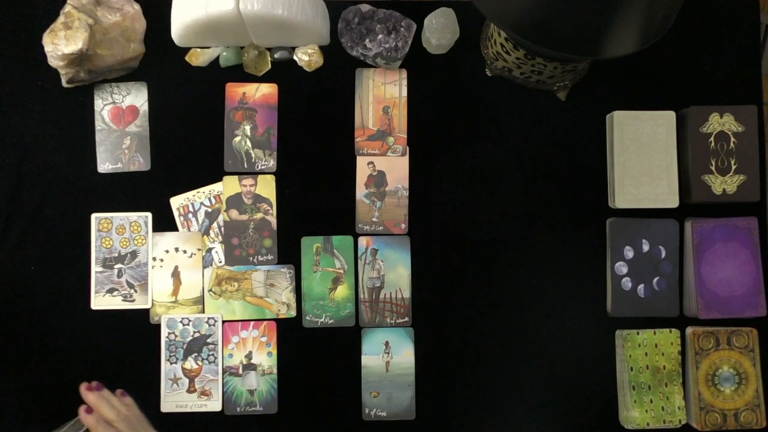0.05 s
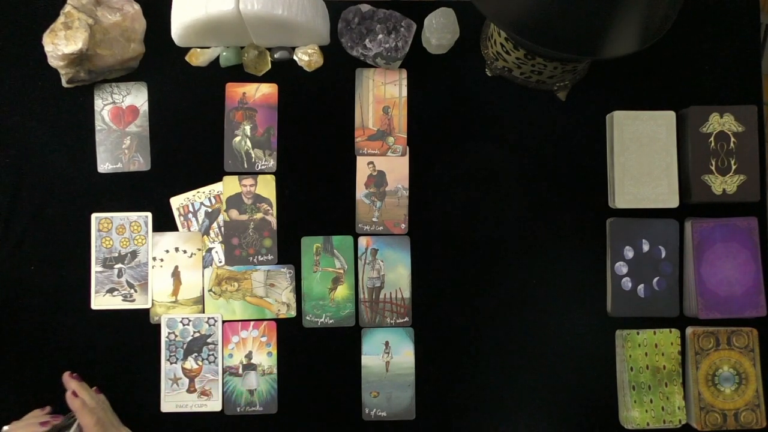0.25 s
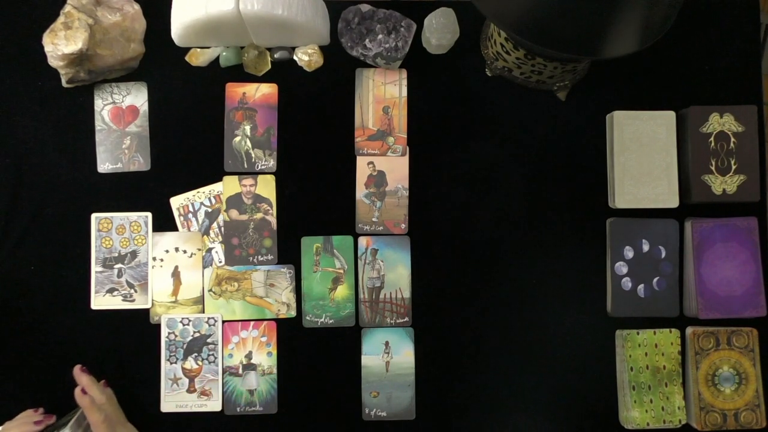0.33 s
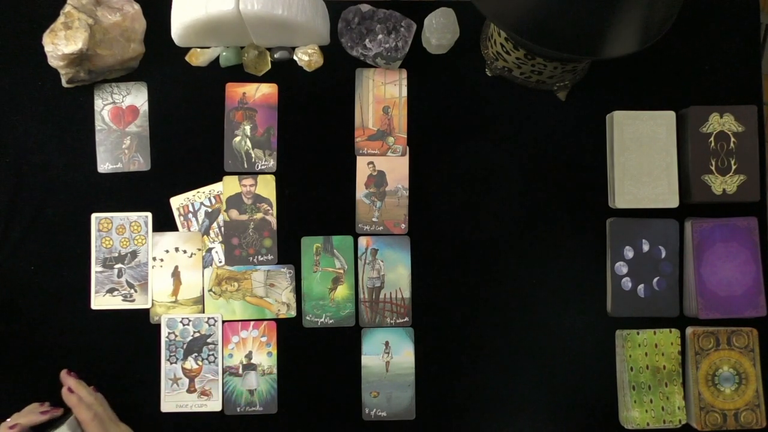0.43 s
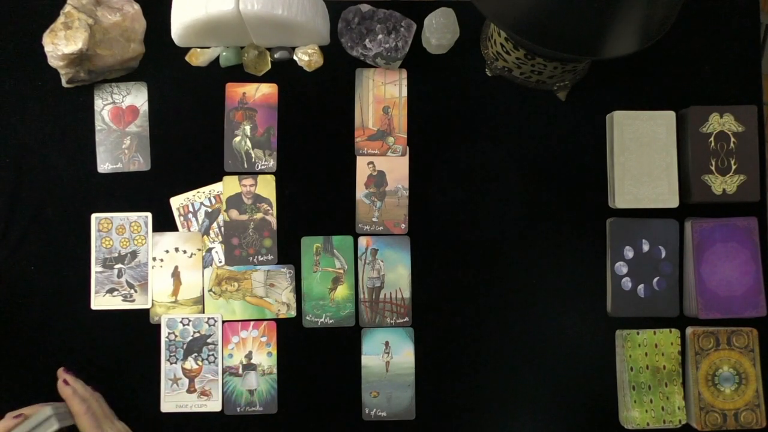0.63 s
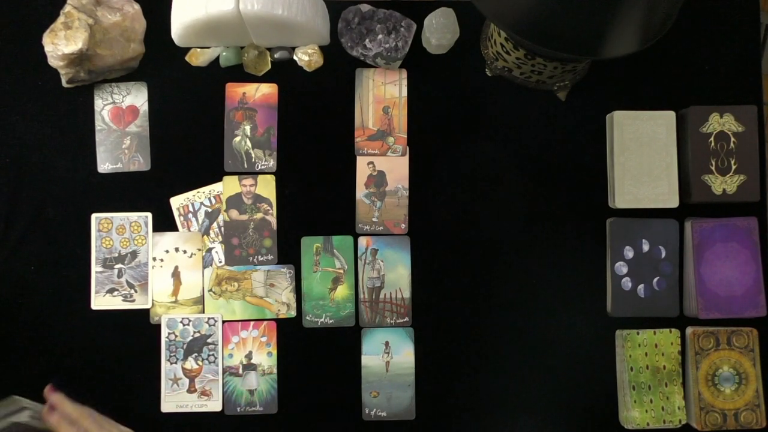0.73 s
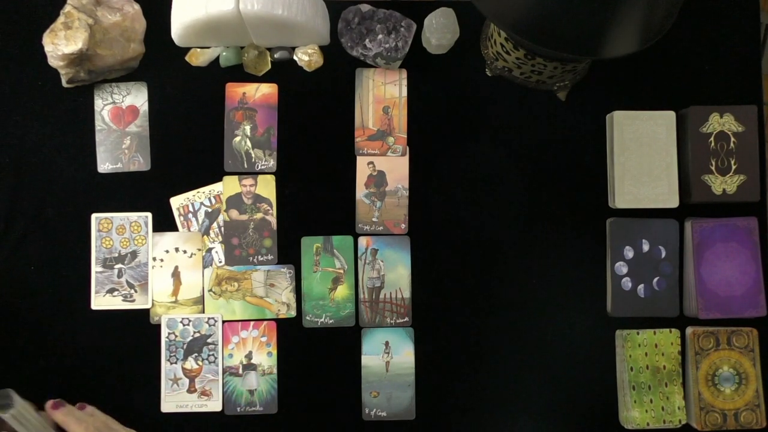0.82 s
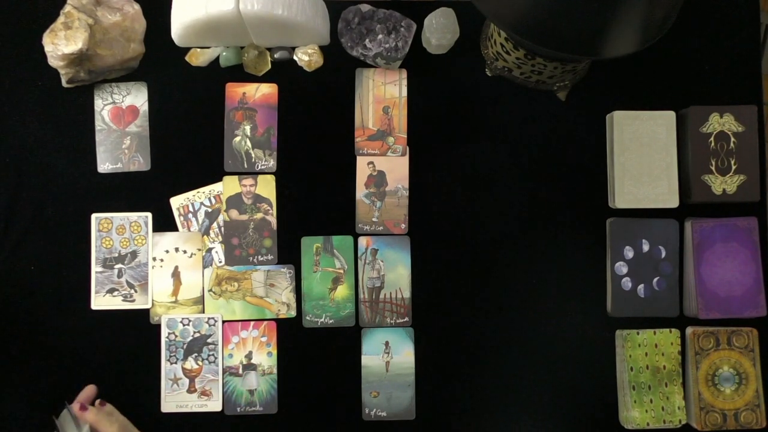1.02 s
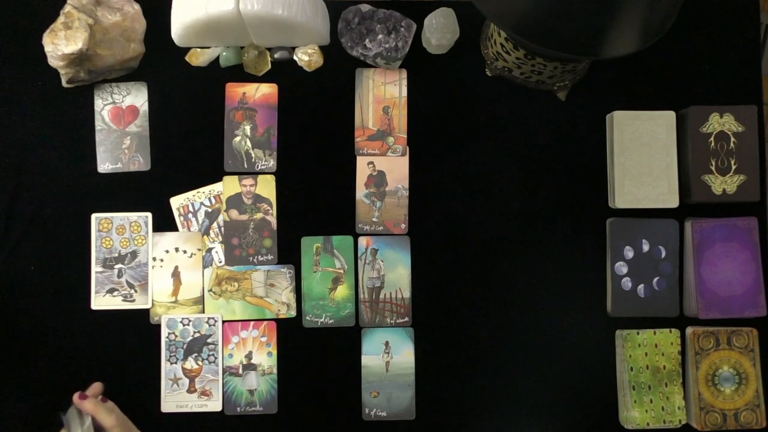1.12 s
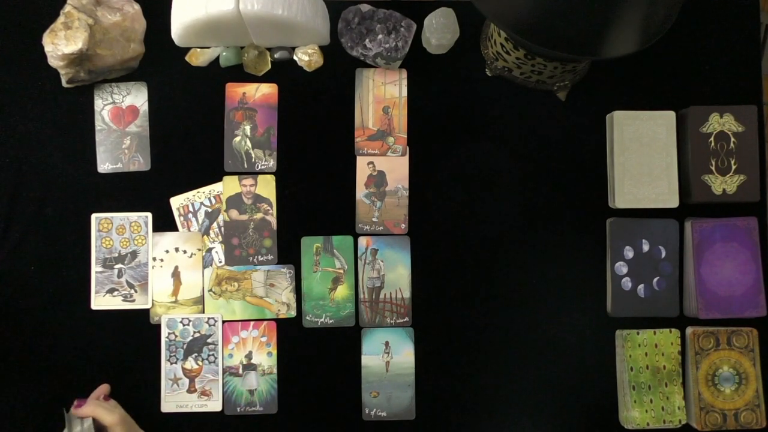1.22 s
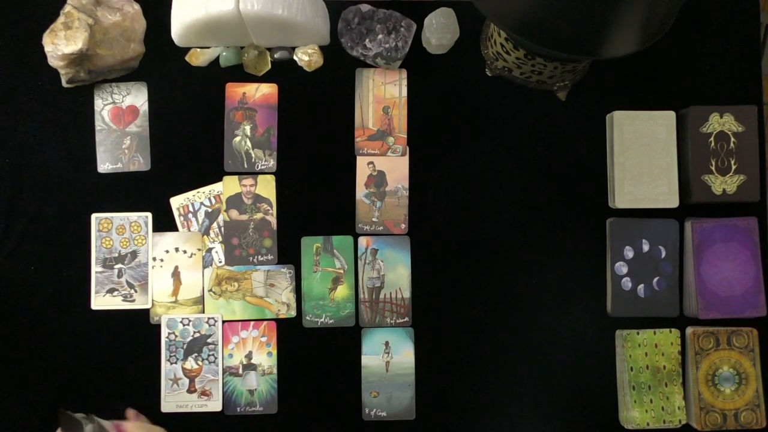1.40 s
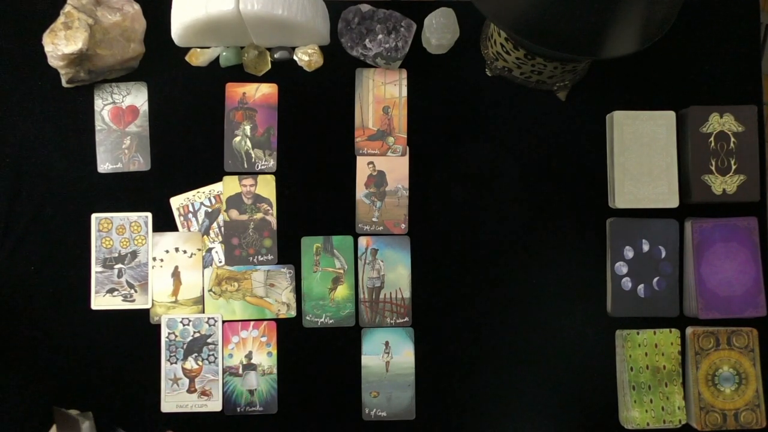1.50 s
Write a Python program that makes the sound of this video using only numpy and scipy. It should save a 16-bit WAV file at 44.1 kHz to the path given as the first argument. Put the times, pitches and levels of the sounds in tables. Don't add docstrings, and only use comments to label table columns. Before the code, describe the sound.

A deck of cards slaps hard onto a cloth-covered wooden table, then cards slide and tick

```python
import sys
import numpy as np
from scipy import signal
from scipy.fft import rfft, irfft
from scipy.io import wavfile
from scipy.ndimage import uniform_filter1d

SR = 44100
rng = np.random.default_rng(int(sys.argv[2]) if len(sys.argv) > 2 else 0)


def master_out(mix):
    frames = np.transpose(np.atleast_2d(mix))
    ceiling = np.clip(frames, -1, 1)
    pcm = np.round(ceiling * 32767).astype(np.int16)
    wavfile.write(sys.argv[1], SR, pcm)


def attenuation_scalar(level_db):
    decades = np.asarray(level_db, float) / 20
    return 10 ** decades


N = 68355
TIME = np.arange(N) / SR


def level(x, db):
    return x * attenuation_scalar(db) / np.sqrt(np.mean(x ** 2))


def noise():
    return rng.standard_normal(N)


def ring(x, hz, t60):
    decay = np.log(1000) / (max(t60, 1e-4) * SR)
    pole = np.exp(2j * np.pi * hz / SR - decay)
    return signal.lfilter([1], [1, -pole], x).imag


def ring_all(force, modes):
    return sum(attenuation_scalar(db) * ring(force, hz, t60) for hz, db, t60 in modes)


def band(x, hz, width):
    b, a = signal.iirpeak(min(hz, SR / 2.5), hz / width, fs=SR)
    return signal.lfilter(b, a, x)


def walk(rate):
    hold = int(SR / rate)
    steps = np.repeat(rng.standard_normal(N // hold + 1), hold)
    return 1.45 * uniform_filter1d(uniform_filter1d(steps, hold), hold)[:N]


def push(start, ms):
    u = (TIME - start) / (ms / 1000)
    force = np.where((u > 0) & (u < 1), np.sin(np.pi * u) ** 2, 0)
    return force / (force.sum() + 1e-9)


def curve(rows):
    return attenuation_scalar(np.interp(TIME, *np.array(rows).T))


# start in seconds, level in dB, contact in ms.
DECK_PUSHES = [
    (0.205, -26, 3.5),
    (0.213, -19, 3.5),
    (0.225, -7, 2.05),
    (0.2315, -1.5, 1.97),
    (.288, -21, 2.6),
    (1.529, -36.5, 2.9),
]
# pitch in Hz, level in dB, t60 in seconds.
TOP_MODES = [(114, -11, 0.068), (133.9, 2, 0.08), (175.1, -6.5, 0.18), (187.7, -15, 0.33),
             (202, -13.5, 0.37)]


def table_top():
    force = sum(attenuation_scalar(db) * push(start, ms) for start, db, ms in DECK_PUSHES)
    return ring_all(force, TOP_MODES)


# start in seconds, level in dB, contact in ms,
# direction and share (down negative, rebound positive).
HAND_HEAVES = [
    (0.221, -9.5, 13, 0.75),
    (0.229, 0.5, 5.05, -0.89),
    (0.284, -9.5, 9.2, -0.92),
]
# pitch in Hz, level in dB, t60 in seconds.
FRAME_MODES = [(40, -3, 0.21), (49, -10.5, 0.15), (58.2, -3, 0.093), (84.6, -11.5, 0.09)]


def frame():
    weight = sum(way * attenuation_scalar(db) * push(start, ms) for start, db, ms, way in HAND_HEAVES)
    return ring_all(weight, FRAME_MODES)


# start in seconds, level in dB.
EDGE_HITS = [(.2196, -9), (.2212, -4.5), (.2228, -13.5), (.2245, -4.5), (.2262, -6), (.2276, -9.5),
             (.2290, -9.5), (.2305, -12.5), (.2325, -14.5), (.2352, -28.5), (.2395, -11), (.243, -18)]
# pitch in Hz, level in dB, t60 in seconds.
SURFACE_MODES = [(580, 9, 0.026), (633, 0.5, 0.053), (979.4, -19, 0.25), (850, 6, 0.012), (1150, 2, 0.025),
                 (1236, 3.5, 0.027), (1503, -5.5, 0.024), (1782, -5, 0.031), (2017, -4, 0.013),
                 (2457, -8, 0.019), (3560, -7, 0.002), (1025, -8.5, 0.074), (1346, -27, 0.56),
                 (2820, -8, 0.0038)]


def landing():
    edge_ms, landing_db = 0.27, -9
    force, sound = 0, 0
    for k, (start, db) in enumerate(EDGE_HITS):
        force = force + (-1) ** (k + 1) * attenuation_scalar(db) * push(start, edge_ms)
    for k, (hz, db, t60) in enumerate(SURFACE_MODES):
        sound = sound + (-1) ** k * attenuation_scalar(db) * ring(force, hz, t60)
    return attenuation_scalar(landing_db) * sound


# start in seconds, level in dB.
HOLLOW_BLOWS = [
    (0.2178, -16),
    (0.2212, -13.5),
    (0.2311, -19),
    (0.2336, -12.5),
]


def knock():
    force = sum(attenuation_scalar(db) * push(start, 1.0) for start, db in HOLLOW_BLOWS)
    return ring(force, hz=347.8, t60=0.069)


# time in seconds, level in dB.
ROCKING_LEVEL = [(0, -58), (.2, -47), (.4, -30), (.55, -29), (.74, -30), (.79, -42.5), (.85, -32.5),
                 (.93, -50), (1, -41.5), (1.2, -46), (1.35, -66), (1.55, -72)]


def rocking():
    rock_hz, pitch_wander, flutter_db = 33, 0.0786, 2.1
    hz = rock_hz * (1 + pitch_wander * walk(2.7))
    sway = np.sin(2 * np.pi * np.cumsum(hz) / SR)
    return sway * attenuation_scalar(flutter_db * walk(8.7)) * curve(ROCKING_LEVEL)


THUMP_STARTS = [.062, .08, .12, .325, .375, .41, .43, .44, .455, .475, .53, .614, .62, .65, .86, .92, 1.,
                1.04, 1.275, 1.505]
# level in dB, pitch in Hz, t60 in seconds.
THUMP_TONES = [(-39, 110, 0.18), (-40.5, 246, 0.18), (-37, 110, 0.21), (-24, 126, 0.1), (-31.5, 72, 0.17),
               (-35, 100, .1), (-21, 117, 0.12), (-30, 67, 0.21), (-34.5, 210, 0.29), (-24.5, 77, 0.096),
               (-36.5, 140, .2), (-26.5, 159, 0.17), (-23, 103.3, 0.15), (-37.5, 210, 0.16),
               (-32, 95, 0.085), (-38.5, 190, 0.19), (-41, 102, .12), (-37, 118, 0.082), (-41, 89, 0.23),
               (-34.5, 130, 0.092)]


def thumps():
    sound = 0
    for start, (db, hz, t60) in zip(THUMP_STARTS, THUMP_TONES):
        sound = sound + attenuation_scalar(db) * ring(push(start, 400 / hz), hz, t60)
    return sound


SLIDE_STARTS = [.154, .218, .375, .583, .74, .899, .949, 1.053, 1.195, 1.212, 1.339, 1.374, 1.437, 1.475,
                .963, .68, .219, .157, .17]
# rise, hold and fade in seconds, level in dB.
SLIDE_SHAPES = [(0.0045, 0.033, 0.13, -42.5), (0.001, 0.019, 0.023, -44), (0.05, 0.011, 0.029, -52.5),
                (0.051, 0.064, 0.12, -53), (0.0059, 0.051, 0.065, -52.5), (0.035, 0.06, 0.038, -50.5),
                (0.016, 0.025, 0.042, -48), (0.0063, 0.019, 0.03, -60), (0.0045, 0.0063, 0.036, -54),
                (0.013, 0.013, 0.034, -58), (0.04, 0.14, 0.11, -52), (0.1, 0.011, 0.13, -44),
                (0.016, 0.01, 0.022, -53.5), (0.013, 0.0081, 0.026, -50.5), (0.0025, 0.025, 0.028, -47),
                (0.033, 0.038, 0.03, -56), (0.0016, 0.003, 0.038, -53), (0.0064, 0.016, 0.11, -45.5),
                (.015, 0.022, 0.036, -50)]
# centre in Hz, width in Hz.
SLIDE_BANDS = [(3700, 6100), (6900, 4300), (6570, 13000), (4470, 8200), (4600, 5000), (5900, 19000),
               (6500, 8100), (6200, 6900), (7600, 4200), (10900, 4900), (5800, 17000), (8000, 11500),
               (2280, 150), (5500, 550), (2100, 450), (12700, 4300), (3200, 1700), (1500, 560), (2600, 420)]


def slides():
    grain_db, flutter_db = 2.5, 1.5
    sound = 0
    for start, (rise, hold, fade, db), (hz, width) in zip(SLIDE_STARTS, SLIDE_SHAPES, SLIDE_BANDS):
        grit = noise() * attenuation_scalar(grain_db * rng.exponential(size=N))
        swell = np.clip((TIME - start) / rise, 0, 1) ** 2
        fading = attenuation_scalar(-30 * np.clip(TIME - start - rise - hold, 0, None) / fade)
        sound = sound + swell * fading * level(band(grit, hz, width), db)
    return sound * attenuation_scalar(flutter_db * walk(120))


# start in seconds, crack level in dB, crack length in ms,
# flex level in dB, flex pitch in Hz.
CARD_TICKS = [(.1555, -38, 2.3, -17, 2280), (0.2032, -51, 1.3, -18.5, 597), (0.6435, -53, 1.8, -29, 1730),
              (0.7308, -38, 1.5, -22, 1830), (0.7291, -35, 1.8, -26, 1870), (0.733, -37, 2, -30, 850),
              (0.7512, -23.5, 1.06, -12, 490), (0.7509, -32.5, 0.74, -27.5, 1400),
              (0.931, -51, 0.94, -49, 900), (.9660, -55, 1.8, -30, 2100), (.9718, -48, 0.89, -34, 1500),
              (0.9753, -44, 0.79, -48, 1500), (0.9776, -39, .8, -30, 1200), (0.9812, -46, 1.2, -48, 1220),
              (0.9870, -44, 1.3, -35, 700), (1.061, -47.5, 1.5, -45, 875), (1.198, -45, 1.3, -49, 880),
              (1.5303, -62, 0.41, -27.5, 438), (0.7504, -62, 1, -20, 3830), (1.538, -57, 1.3, -23, 680),
              (1.538, -60, 1, -30, 3000)]


def ticks():
    contact_cycles, flex_cycles = 0.52, 3.2
    cracks, flex = 0, 0
    grit = level(band(noise(), 5430, 6000), 0)
    for start, crack_db, ms, flex_db, hz in CARD_TICKS:
        fading = attenuation_scalar(-12 * np.clip(TIME - start, 0, None) / (ms / 1000))
        cracks = cracks + attenuation_scalar(crack_db) * (TIME >= start) * fading
        force = push(start, contact_cycles * 1000 / hz)
        flex = flex - attenuation_scalar(flex_db) * ring(force, hz, flex_cycles / hz)
    return cracks * grit + flex


# the edge lets go, the card bends, the face lands. Kick times in seconds.
SNAP_KICKS = [1.52722, 1.52731, 1.52733, 1.52733, 1.52741, 1.52754, 1.5285]
# pitch in Hz, level in dB, t60 in seconds, direction and share.
SNAP_MODES = [(4000, -10, 0.00044, 0.63), (5300, 1.5, 0.00077, -1), (8250, -7, 0.00058, -1),
              (13000, -17, 0.00036, -0.54), (3260, -2.5, 0.0016, 0.9), (1090, 1, 0.0042, -1.05),
              (3000, -26.5, 0.011, 0.73)]


def snap():
    snap_db, kick_ms = -6, 0.06
    sound = 0
    for start, (hz, db, t60, way) in zip(SNAP_KICKS, SNAP_MODES):
        sound = sound + way * attenuation_scalar(db) * ring(push(start, kick_ms), hz, t60)
    return attenuation_scalar(snap_db) * sound


# start in seconds, level in dB.
EDGE_TAPS = [
    (.9751, -28),
    (.9774, -28),
    (.985, -35),
]
# pitch in Hz, level in dB, t60 in seconds.
DECK_MODES = [(850, -10.5, 0.029), (1200, -4, 0.015), (1500, -0.5, 0.0066), (2040, -16, 0.044)]


def tap():
    force = sum(attenuation_scalar(db) * push(start, 0.33) for start, db in EDGE_TAPS)
    return -ring_all(force, DECK_MODES)


# time in seconds, level in dB.
RUSTLE_LEVEL = [(0, -66), (.05, -62), (.14, -67.5), (.3, -82), (.36, -72.5), (.48, -66), (.57, -74.5),
                (.62, -58.5), (.83, -72), (.9, -65), (1.03, -65), (1.1, -66.5), (1.185, -72), (1.21, -69),
                (1.33, -60), (1.55, -68)]


def rustle():
    brush = level(band(noise(), 5150, 5400), 0)
    return brush * curve(RUSTLE_LEVEL) * attenuation_scalar(1.9 * walk(39.3))


# band centre in Hz, t60 in seconds, level in dB.
ROOM_BANDS = [(310, 0.37, -19.5), (525, 0.29, -29.5), (1000, 0.57, -22), (1400, 0.56, -26),
              (1970, 0.43, -24), (2900, 0.23, -21.5), (4200, 0.52, -20), (8800, 0.038, -5)]


def room(x):
    gap_s, tail_db = 0.007, -31
    t = np.arange(int(0.8 * SR)) / SR
    tail = 0
    for hz, t60, db in ROOM_BANDS:
        diffuse = band(rng.standard_normal(len(t)), hz, hz * 1.06)
        tail = tail + level(diffuse, db + tail_db) * attenuation_scalar(-60 * t / t60)
    build_up = np.clip(t / gap_s, 0, 1) ** 2
    return signal.fftconvolve(x, tail * build_up)[:N]


# frequency in Hz, density in dB per Hz.
HUM_SPECTRUM = [(15, -10), (25, -4.5), (84, 0.5), (206, -10.5), (285, -13.5), (1290, -24.5), (1890, -30.5),
                (7710, -36.5), (16000, -59)]
# centre in Hz, width in Hz, level in dB.
DRONE_PEAKS = [(119.8, 12.4, -49), (199.5, 27, -50), (430.3, 31, -61.5)]


def hum():
    hum_db, hiss_tilt_db = -45.5, -12.5
    f = np.maximum(np.arange(N // 2 + 1) * SR / N, 1)
    hz, db = np.array(HUM_SPECTRUM).T
    spectrum_db = np.interp(np.log(f), np.log(hz), db)
    tilt_db = hiss_tilt_db * np.clip(np.log2(f / 2500), 0, 1)
    bed = irfft(rfft(noise()) * attenuation_scalar(spectrum_db + tilt_db), N)
    drone = 0
    for centre, width, peak_db in DRONE_PEAKS:
        narrow = band(band(noise(), centre, width), centre, width)
        drone = drone + level(narrow, peak_db)
    return level(bed, hum_db) + drone * attenuation_scalar(0.83 * walk(5.0))


def scene():
    table = table_top() + frame() + thumps() + rocking()
    slap, hollow = landing(), knock()
    cards = slides() + ticks() + snap() + tap() + rustle()
    echoes = room(slap + attenuation_scalar(-5.5) * hollow + attenuation_scalar(-8.5) * cards)
    mono = table + slap + hollow + cards + echoes + hum()
    return mono[None]


def low_pass(x):
    return signal.sosfilt(signal.butter(12, 16490, fs=SR, output="sos"), x)


def record(dry):
    low_hz, ceiling, top_hz = 24, 0.96, 15800
    x = signal.sosfilt(signal.butter(2, low_hz, "high", fs=SR, output="sos"), dry)
    x = x / (1 + np.abs(x / ceiling) ** 5) ** (1 / 5)
    x = signal.sosfilt(signal.ellip(8, 0.2, 40, top_hz, fs=SR, output="sos"), x)
    return low_pass(x)


dry = scene()
out = record(dry)
master_out(out)
```